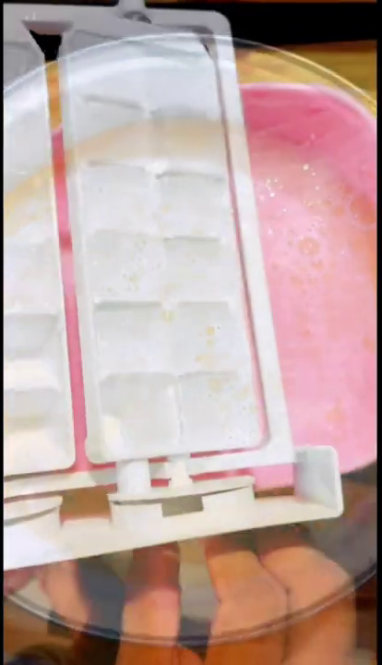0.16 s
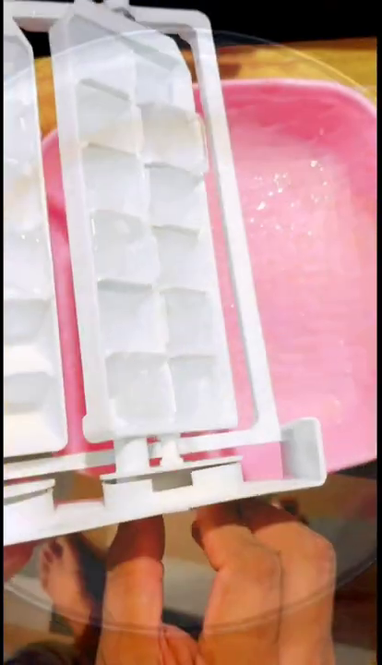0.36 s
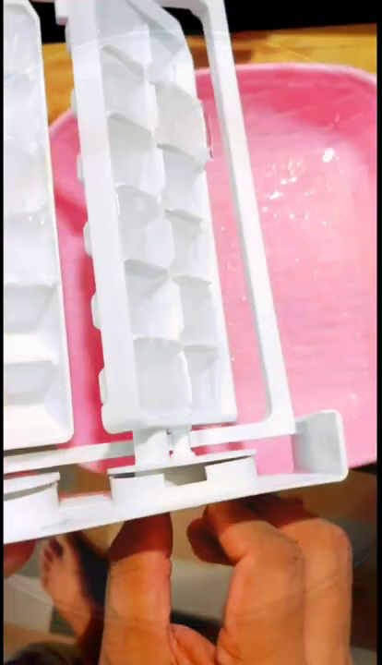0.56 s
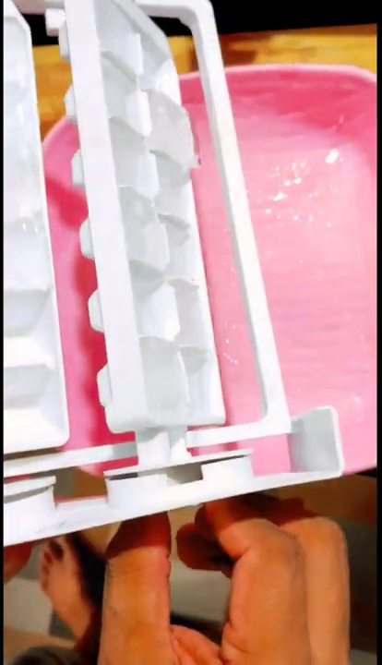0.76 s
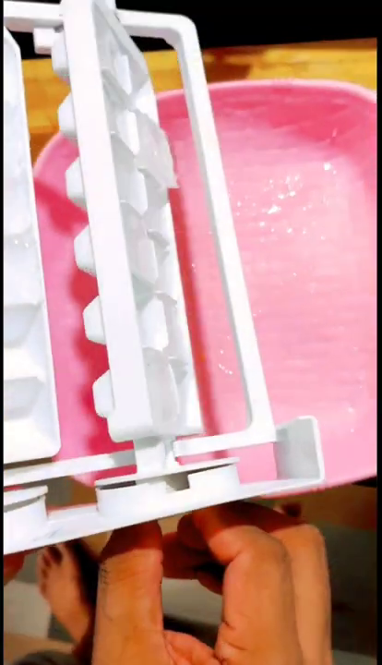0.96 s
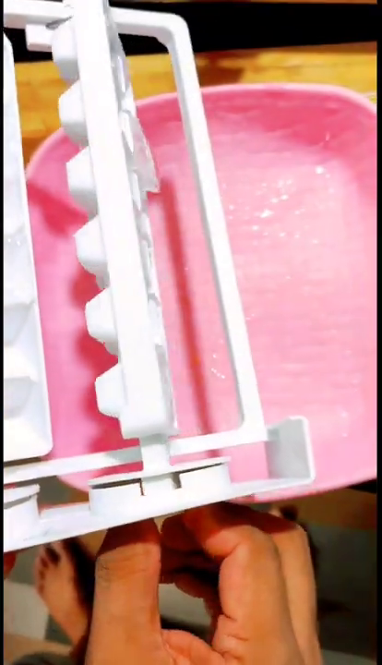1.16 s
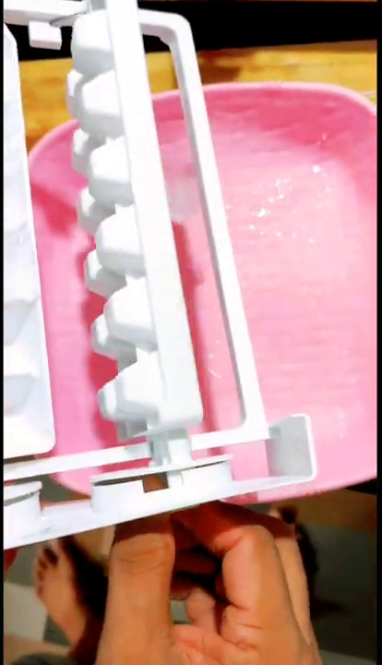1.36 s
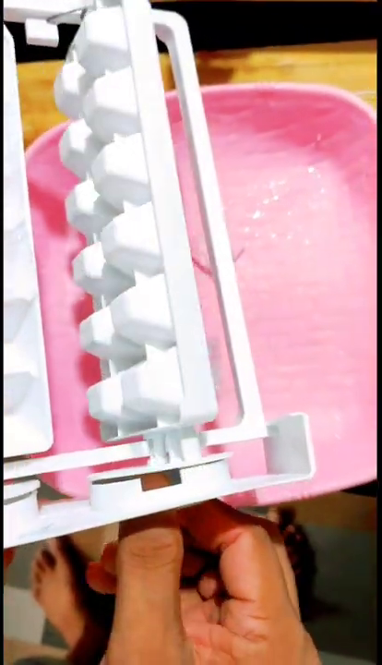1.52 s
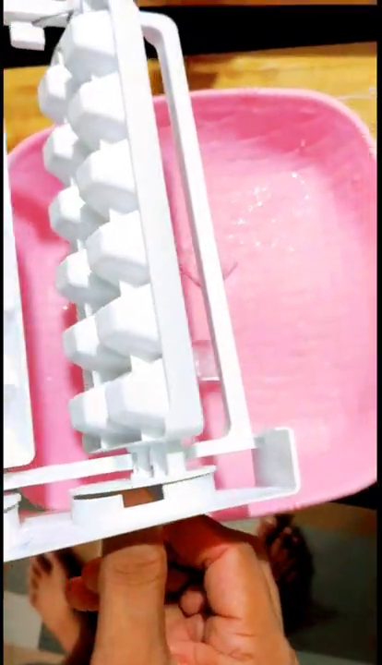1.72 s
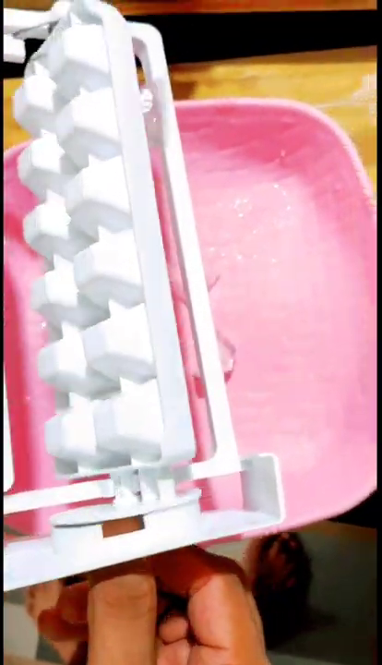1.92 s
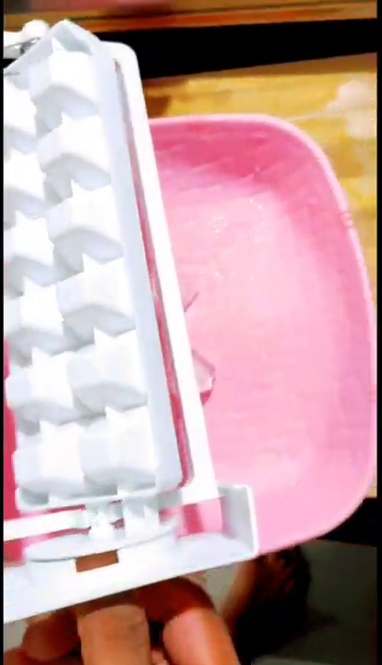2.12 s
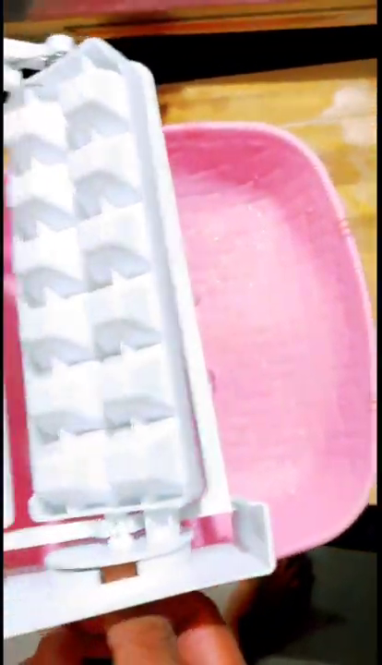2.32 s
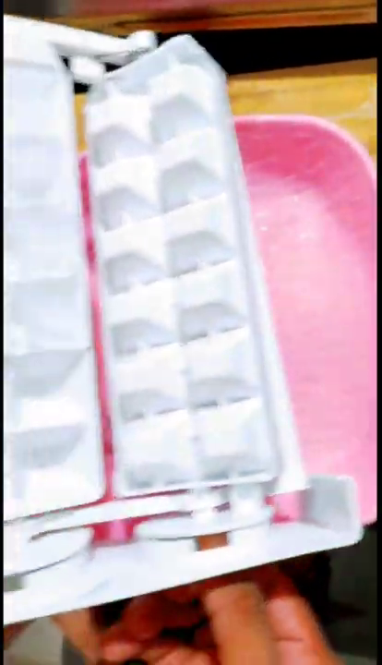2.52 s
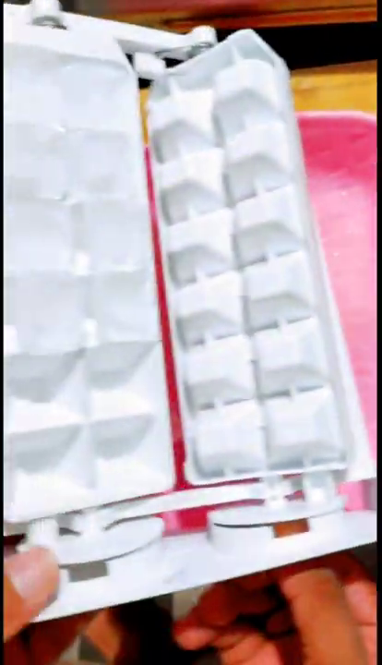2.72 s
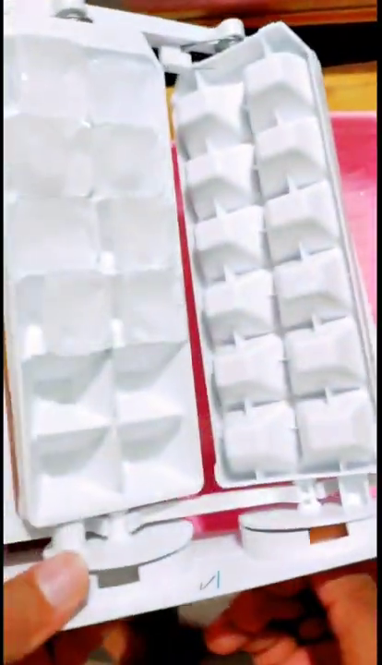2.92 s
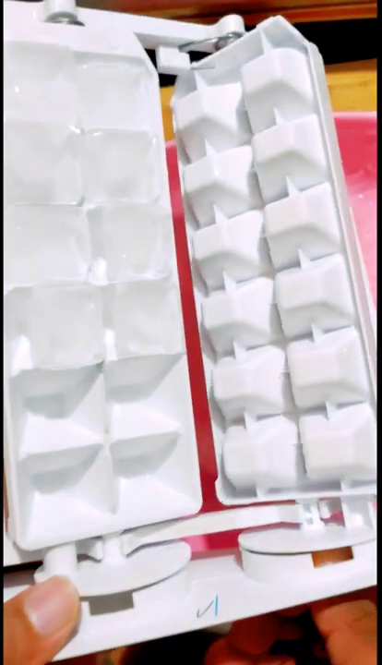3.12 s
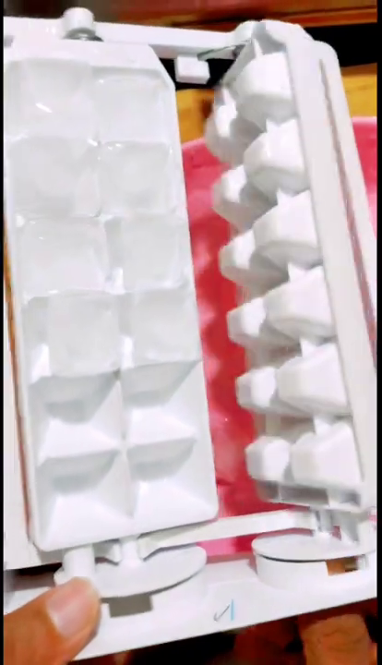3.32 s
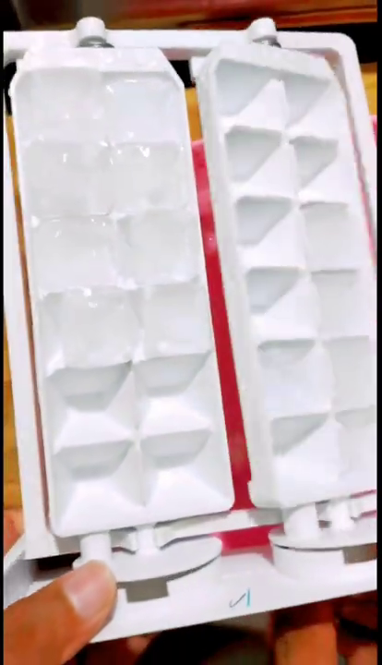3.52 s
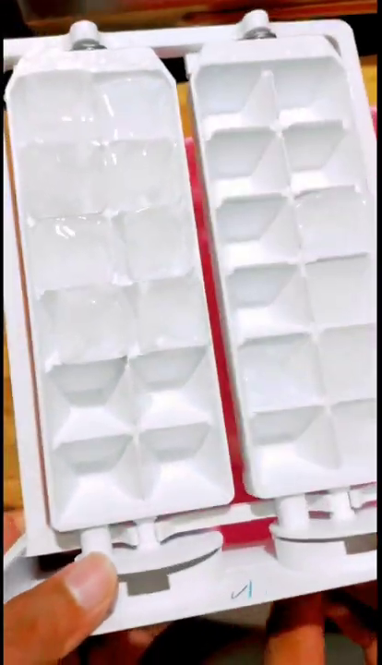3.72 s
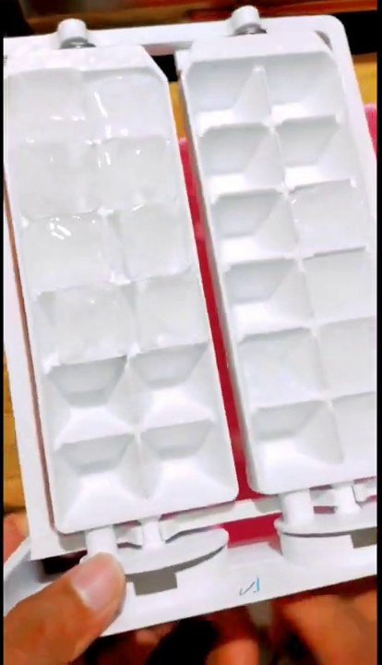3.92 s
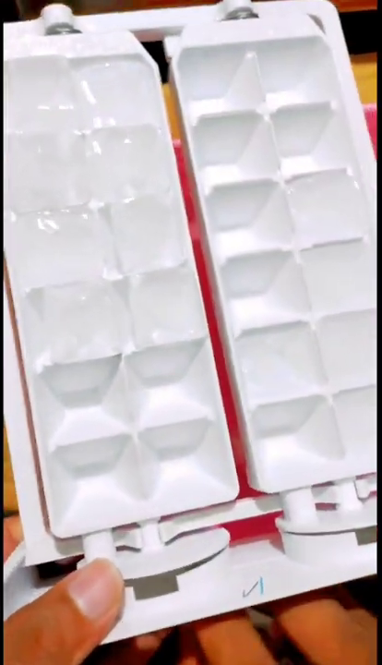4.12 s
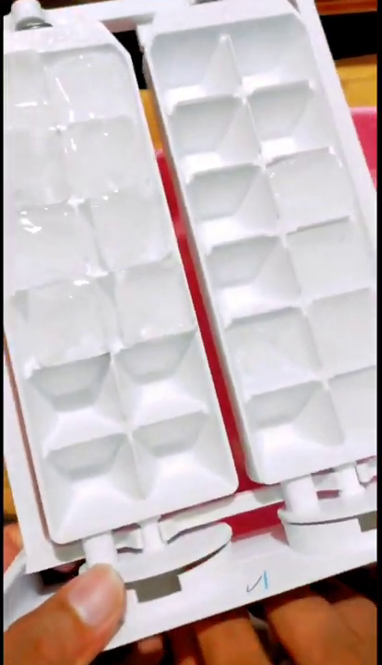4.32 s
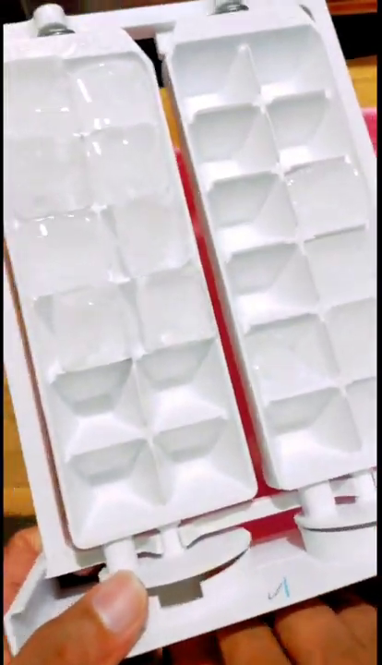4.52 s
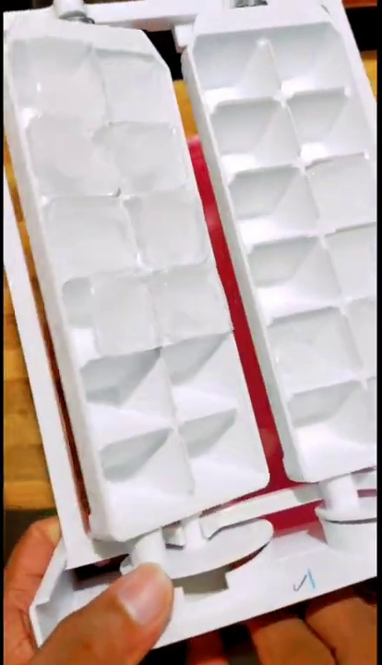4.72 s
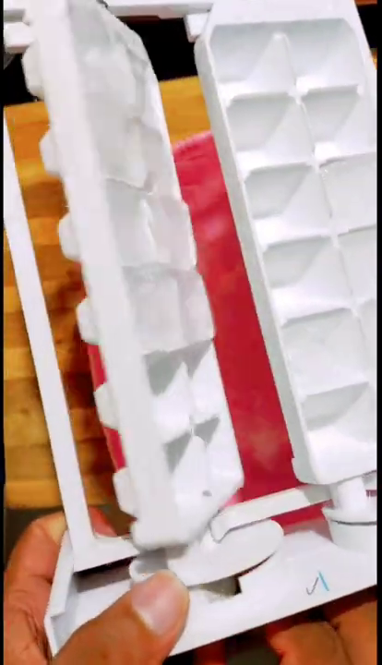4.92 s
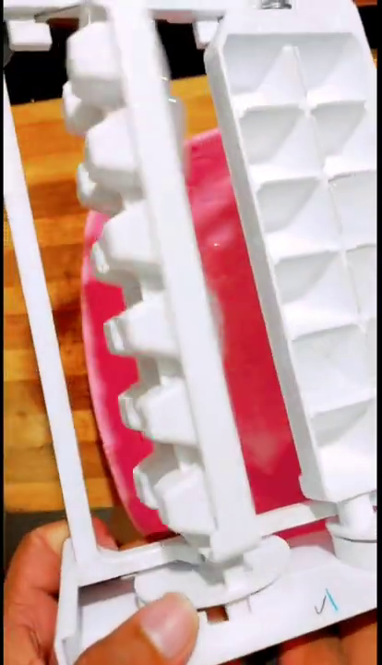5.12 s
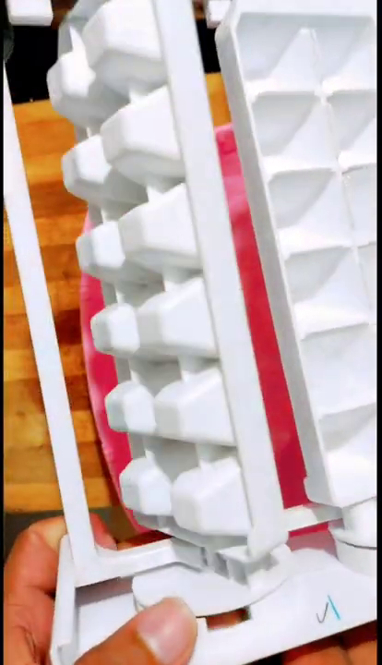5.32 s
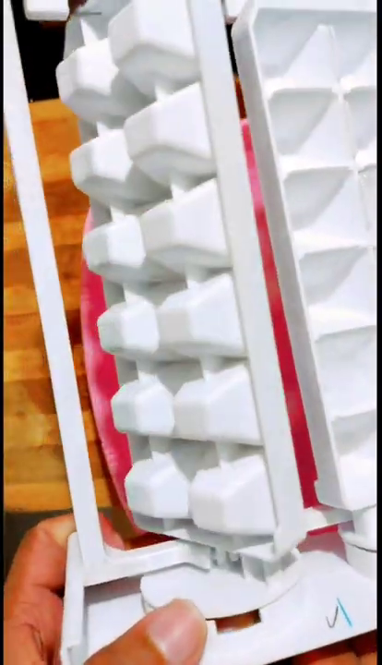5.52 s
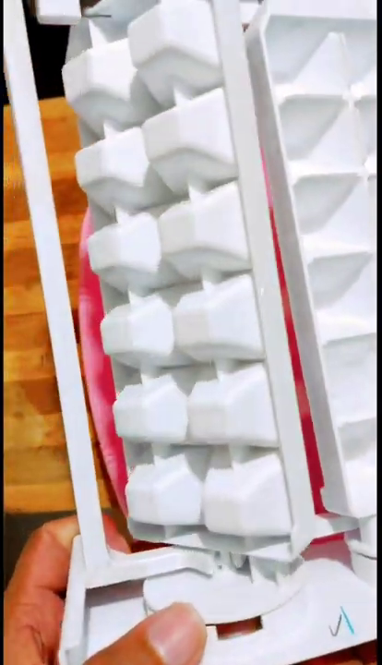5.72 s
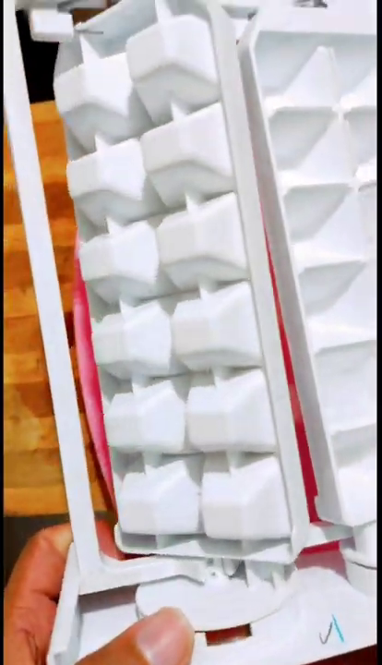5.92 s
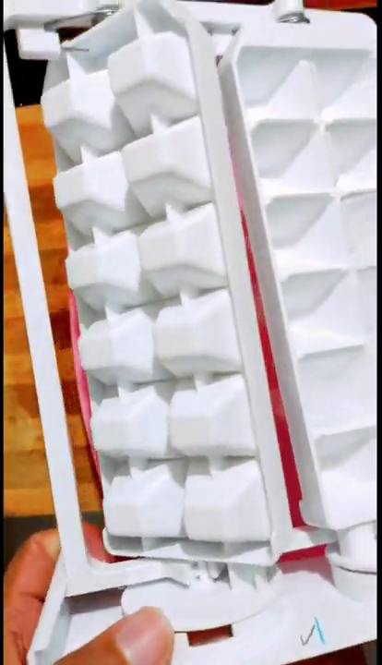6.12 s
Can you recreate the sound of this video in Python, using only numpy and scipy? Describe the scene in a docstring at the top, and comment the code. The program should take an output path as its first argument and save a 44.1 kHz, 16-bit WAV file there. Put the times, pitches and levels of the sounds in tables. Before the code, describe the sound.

In a small hard-walled kitchen, close up, a faint gurgle of liquid fades over soft room tone and low fridge hum. A plastic tray pivot squeaks lightly, then ice cubes knock sharply into a plastic basin and tumble for about a second and a half. Quiet handling follows, then a rougher squeak and a second, denser cascade of ice.

```python
"""Ice cubes crack loose from a turned tray, drop into a plastic basin, knock it and tumble together.
Each contact is a short burst of jolts that rings basin floor, basin wall and ice; the hard walls of the
kitchen answer with decaying noise. The tray's pivots squeak as rough gliding notes and hands rustle on
the frame as noise. Behind them are a humming fridge, a faint whine, room tone and a gurgling glass."""
import sys
import numpy as np
from scipy import signal
from scipy.fft import rfft, irfft, next_fast_len
from scipy.io import wavfile
from scipy.ndimage import uniform_filter1d, map_coordinates

SR = 44100
rng = np.random.default_rng(int(sys.argv[2]) if len(sys.argv) > 2 else 0)


def file_out(sig):
    """Save sig as 16-bit WAV at sys.argv[1]."""
    # one column per channel
    cols = np.atleast_2d(sig).T
    # limit, then scale
    lim = np.clip(cols, -1, 1)
    pcm = np.round(lim * 32767).astype(np.int16)
    wavfile.write(sys.argv[1], SR, pcm)


N = 276066  # length in samples
TIME_S = np.arange(N) / SR


def amp(db):
    """Turn decibels into a plain gain."""
    return 10 ** (np.asarray(db) / 20)


def unit(x):
    """Scale a signal to an rms of 1."""
    return x / np.sqrt(np.mean(x ** 2) + 1e-20)


def along(points, hz):
    """Read a curve of (Hz, value) points between its points, on a log frequency axis."""
    f, v = np.transpose(points)
    return np.interp(np.log(hz + 1), np.log(f + 1), v)


def filtered(x, response):
    """Multiply the spectrum of x by a response, which may be complex."""
    m = next_fast_len(x.shape[-1] + 8192)  # spare room for the ringing
    spectrum = rfft(x, m) * response(np.fft.rfftfreq(m, 1 / SR))
    return irfft(spectrum, m)[..., :x.shape[-1]]


def modes(table):
    """A struck body rings at several resonances; neighbours have opposite signs."""
    def response(f):
        total = 0
        for k, (center, width, db) in enumerate(table):
            resonance = 1j * f * width / (center * center - f * f + 1j * f * width)
            total = total + (-1) ** k * amp(db) * resonance
        return total
    return response


def causal(points):
    """Minimum phase: the given spectrum, with its energy as early as possible."""
    def response(f):
        cepstrum = irfft(np.log(amp(along(points, f)) + 1e-6))
        cepstrum[1:len(cepstrum) // 2] *= 2
        cepstrum[len(cepstrum) // 2 + 1:] = 0
        return np.exp(rfft(cepstrum))
    return response


# Left-right likeness of sound from all around: (frequency [Hz], likeness [0-1])
LIKENESS = [(60, .85), (150, .92), (350, 0.94), (700, 0.8), (1400, 0), (5000, 0.03)]


def diffuse(pair):
    """Mix two unrelated signals so that long waves are alike in both ears."""
    def mix(hz):
        angle = np.arccos(np.clip(along(LIKENESS, hz), -1, 1)) / 2
        return np.array([np.cos(angle), np.sin(angle)])
    mid, side = filtered(pair, mix)
    return np.array([mid + side, mid - side])


def patchy_noise(spectrum, patchy_db):
    """Stereo noise of rms 1 that flickers in patches of time and pitch."""
    z = signal.stft(rng.standard_normal((2, N)), nperseg=512)[2]
    field = uniform_filter1d(rng.standard_normal(z.shape[1:]), size=6, axis=0)
    field = uniform_filter1d(field, size=10, axis=1)
    pair = signal.istft(z * amp(patchy_db * unit(field)), nperseg=512)[1][:, :N]
    return unit(filtered(diffuse(pair), lambda hz: amp(along(spectrum, hz))))


def wavering_note(hz, db, width_hz, steady):
    """A note whose size and phase wander, as noise in a narrow band does."""
    knots = rng.standard_normal((2, int(N * width_hz / SR) + 4))
    a, b = (map_coordinates(k, [np.arange(N) * width_hz / SR]) for k in knots)
    phase = 2 * np.pi * np.cumsum(hz + np.zeros(N)) / SR
    return amp(db) * ((a + steady) * np.cos(phase) + b * np.sin(phase))


def swells(start_s, held_s, db, rise, fall):
    """Each event rises, holds and falls evenly in dB; returns the top level and which event has it."""
    since = TIME_S - start_s[:, None]
    attack = rise * np.minimum(since, 0)
    release = fall * np.maximum(since - held_s[:, None], 0)
    each = db[:, None] + attack - release
    return each.max(axis=0), each.argmax(axis=0)


# Loudness of the room's air over time: (time [s], level [dB])
AIR_LEVEL = [(0, -57), (.08, -50), (.3, -61), (1.552, -54), (3.35, -59.5), (4.2, -58.5), (5.3, -57)]
# Colour of the room's air: (frequency [Hz], density [dB per Hz, relative])
AIR_SPECTRUM = [(24, -31.5), (40, 8.5), (132, -5.5), (192, -3), (377, -3), (438, -9.5), (1450, -24),
                (4030, -34.5), (7340, -39), (12100, -34), (14400, -45), (15500, -57.5)]


def room_tone():
    """The air of the room is a soft noise of slowly changing level."""
    level_db = np.interp(TIME_S, *np.transpose(AIR_LEVEL))
    return amp(level_db) * patchy_noise(AIR_SPECTRUM, patchy_db=3)


# Notes of the fridge: (frequency [Hz], level [dB], width [Hz], steady part [ratio])
FRIDGE_NOTES = [(50.2, -69.5, 2.7, 0.24), (186, -73.5, 5.2, 3.9)]


def fridge():
    """A fridge hums on low notes that waver a little."""
    return sum(wavering_note(*note) for note in FRIDGE_NOTES)


# Gulps of liquid settling in a glass: (loudest from [s], held [s], level [dB], note [Hz], glide [Hz per s])
GULPS = [(0.041, 0.016, -58.5, 1295, -300), (0.159, 0.047, -63, 1073, -500), (.5, 0.26, -70, 693, 257)]


def gurgle():
    """Each gulp of liquid is a rough note that glides."""
    start_s, held_s, db, hz, glide = np.transpose(GULPS)
    level_db, gulp = swells(start_s, held_s, db, rise=500, fall=300)  # dB per s
    note_hz = hz[gulp] + glide[gulp] * (TIME_S - start_s[gulp])
    return wavering_note(note_hz, level_db, width_hz=280, steady=0.1)


# Hands shift on the frame: (loudest from [s], held [s], level [dB])
HAND_SHIFTS = [(.09, 0.076, -68), (.81, 0.046, -77.5), (1.17, 0.091, -86), (1.45, 0.078, -73),
               (3.41, .02, -68.5), (3.56, 0.024, -67.5), (3.73, .02, -70), (4.08, 0.027, -76.5),
               (4.21, 0.0086, -73.5), (4.85, .3, -67.5), (5.34, 0.036, -53.5)]


def grip_level():
    """Each shift of the hands swells quickly and dies more slowly; in dB."""
    return swells(*np.transpose(HAND_SHIFTS), rise=160, fall=72)[0]  # dB per s


def whine(grip_db):
    """A faint high whine grows while hands load the frame."""
    rest_db, under_grip_db = -92.5, 11
    level_db = np.maximum(rest_db, grip_db - under_grip_db)
    return wavering_note(4010, level_db, width_hz=380, steady=.1)


# Colour of skin on the frame: (frequency [Hz], density [dB per Hz, relative])
SKIN_SPECTRUM = [(530, -52), (900, -17.5), (2000, -20), (2890, -9.5), (3180, -22.5), (3300, -14.5),
                 (13000, -17), (14600, -22.5), (15500, -52.5)]


def hands(grip_db):
    """Skin rubbing on the frame makes a patchy rustle."""
    return amp(grip_db) * patchy_noise(SKIN_SPECTRUM, patchy_db=2.5)


def background():
    """Room tone, fridge, glass and hands, added together."""
    grip_db = grip_level()
    return fridge() + whine(grip_db) + gurgle() + room_tone() + hands(grip_db)


# The tray turns on its pivots:
# (loudest from [s], held [s], low pivot level [dB], high pivot level [dB], low pivot note [Hz])
TRAY_TURNS = [(1.33, .1, -72.5, -99, 2651), (1.47, 0.11, -64.5, -87, 2720), (4.46, 0.048, -70, -78.5, 2630),
              (5.02, 0.047, -71.5, -71.5, 2585), (5.35, .02, -57, -79, 2640)]


def squeaks():
    """Plastic pivots rub and sing roughly; each note sinks as the turn slows."""
    rise, fall, sag_hz_per_s = 150, 61, 200  # rise and fall in dB per s
    high_hz, high_leads_s = 3117, .05  # the high pivot has a head start
    start_s, held_s, low_db, high_db, low_hz = np.transpose(TRAY_TURNS)
    low_level, low_turn = swells(start_s, held_s, low_db, rise, fall)
    high_level, high_turn = swells(start_s - high_leads_s, held_s, high_db, rise, fall)

    def sag(turn):
        return sag_hz_per_s * np.clip(TIME_S - start_s[turn], -.2, .4)

    def one_ear():
        low = wavering_note(low_hz[low_turn] - sag(low_turn), low_level, width_hz=190, steady=0.71)
        high = wavering_note(high_hz - sag(high_turn), high_level, width_hz=120, steady=2.1)
        return low + high
    return np.array([one_ear(), one_ear()])


# Reverberation of the kitchen: (frequency [Hz], time to fall by 60 dB [s])
KITCHEN_T60 = [(150, 0.4), (500, 0.39), (2500, 0.27), (8000, 0.27), (15000, 0.21)]


def kitchen(dry, size=4096):
    """Hard walls answer with fading noise; the cubes move, so each moment gets its own tail."""
    wet = np.zeros((2, N + SR))
    for at in range(0, N, size):
        part = dry[at:at + size]
        if np.abs(part).max() > 1e-4:  # skip near silence
            hz, t, z = signal.stft(rng.standard_normal((2, SR // 2)), SR, nperseg=256)
            decay = amp(-60 * t / along(KITCHEN_T60, hz)[:, None])
            tail = signal.istft(z * decay, SR, nperseg=256)[1]
            tail *= 1 - np.exp(-np.arange(tail.shape[1]) / SR / 0.00059)  # a soft start
            tail /= np.linalg.norm(tail[0])
            answer = signal.fftconvolve(part[None], tail, axes=1)
            wet[:, at:at + answer.shape[1]] += answer
    return diffuse(wet[:, :N])


# Cubes slide and rattle after a spill: (loudest from [s], held [s], level of the softest contacts [dB])
SLIDES = [(1.76, 0.24, -44), (2.35, 0.11, -30), (2.55, 0.58, -38), (5.53, .24, -27), (5.85, 0.26, -41)]


def tumble(count=300):
    """Sliding cubes make many small contacts of random size; columns as in CONTACTS."""
    level_db = swells(*np.transpose(SLIDES), rise=200, fall=130)[0]  # dB per s
    draw = rng.random((count, 5))
    moving = np.flatnonzero(level_db > -62)
    at = moving[(draw[:, 0] * len(moving)).astype(int)]
    db = level_db[at] + 12 * draw[:, 1]
    thud_db = -14 + 9 * draw[:, 2]
    click_db = -26 + 9 * draw[:, 3]
    spot_hz = 500 * 5 ** draw[:, 4]
    return np.column_stack([at / SR, db, thud_db, click_db, spot_hz])


# Resonances of the basin floor: (frequency [Hz], width [Hz], relative level [dB])
FLOOR_MODES = [(204, 51, -10), (321, 44, 1), (378.4, 6, 1.5), (490, 23, 3.5), (520.2, 9.9, -8.5)]
# Resonances of basin wall and tray cells: (frequency [Hz], width [Hz], relative level [dB])
WALL_MODES = [(720, 6.4, -11.5), (875, 13, 6.5), (958, 37, -3), (1284, 27, -9.5), (1560, 40, -2.5),
              (1947, 7.7, 4.5), (1964, 110, -3), (2040, 33, -7)]
# Click of ice: (frequency [Hz], density [dB per Hz, relative])
ICE_SPECTRUM = [(1180, -38), (2000, -21), (2560, -10), (3070, -5), (7050, -8.5), (7610, -9.5), (11100, -7),
                (14700, -16), (15500, -25)]
# The part of a knock that does not ring: (frequency [Hz], relative level [dB])
BLOW_SPECTRUM = [(60, -14.5), (160, -9), (400, -3), (1000, -1.5), (2200, 0.5), (3000, -5.5), (4500, -11),
                 (9000, -23)]


def strike(contacts, size=1024):
    """A few ms of jolts ring basin floor, basin wall and ice; rows: left, right, all around."""
    floor_db, wall_db, click_gain_db = 32.5, 16, 27  # how readily each body answers a blow
    spot_t60_s = 0.02
    # force is (floor, wall, ice) by (left, right, all around)
    force, spot = np.zeros((3, 3, N + size)), np.zeros((3, N + size))
    t = np.arange(size) / SR
    t60_s = np.array([[[.018]], [[.009]], [[.011]]])
    fade = amp(-60 * t / t60_s) * (1 - np.exp(-t / 0.00045))
    for s, db, thud_db, click_db, spot_hz in contacts:
        # short waves differ more between the ears
        both, own = rng.standard_normal((3, 1, size)), rng.standard_normal((3, 2, size))
        jolts = fade * ([[[1]], [[.6]], [[.2]]] * both + [[[.15]], [[.9]], [[1]]] * own)
        jolts[..., :6] += [[[.3]], [[.8]], [[.8]]]  # a push at first touch
        jolts /= np.linalg.norm(jolts, axis=2, keepdims=True)
        blow = amp(db + np.array([thud_db + floor_db, wall_db, click_db + click_gain_db]))
        at = round(s * SR)
        aim = amp(rng.normal(1, 1, (2, 1)))  # each blow favours one ear a little
        force[:, :2, at:at + size] += blow[:, None, None] * aim * jolts
        force[2, 2, at:at + size] += blow[2] * jolts[2, 0]
        # summed over all directions the blow has an even spectrum
        force[:2, 2, at] += rng.choice([-1, 1], size=2) * blow[:2]
        # the struck spot has a note of its own that dies at once
        phase = 2 * np.pi * (spot_hz * t + rng.random((3, 1)))
        spot_level = amp(db - 6 - 60 * t / spot_t60_s + [[0], [0], [-9]])
        spot[:, at:at + size] += spot_level * (1 - np.exp(-t / 0.00028)) * np.sin(phase)

    def floor(f):
        return modes(FLOOR_MODES)(f) + amp(-10.0) * causal(BLOW_SPECTRUM)(f) / (1 + 1j * f / 700)

    def wall(f):
        return modes(WALL_MODES)(f) + causal(BLOW_SPECTRUM)(f)

    thuds, knocks = filtered(force[0], floor), filtered(force[1], wall)
    clicks = filtered(force[2], causal(ICE_SPECTRUM))
    return spot + thuds + knocks + clicks


# Knocks and cracks, levels before each body's own gain: (time [s], wall level [dB],
# basin thud over wall [dB], ice click over wall [dB], note of the struck spot [Hz])
CONTACTS = [(0.48, -49, -6, 3, 3750), (0.949, -63.5, 13, -15, 538), (0.998, -54, 3, -34, 517),
            (1.483, -50.5, -16, -25, 2480), (1.589, 1, -13, -16, 2025), (1.597, -1.5, -10, -16.5, 1725),
            (1.706, -4, -14.5, -17, 1810), (1.737, -17, -29, 1, 3990), (1.836, 0, -8.5, -15.5, 1988),
            (1.919, -9, -13.5, -13.5, 954), (1.951, -11.5, -11, -17, 1764), (2.1, -22, -36, 2.5, 3900),
            (2.109, -16, -41, -12.5, 1790), (2.214, 0.5, -8.5, -19.5, 1500), (2.324, 0, -8.5, -18, 1325),
            (2.33, -5.5, -9, -24.5, 1817), (2.342, -1, -33, -15.5, 1807), (2.498, -16, -10.5, -20.5, 1866),
            (2.559, -14, -20, -14.5, 1980), (2.566, -13.5, -35, 0, 3300), (2.574, -20, -5, -10.5, 2818),
            (2.632, -20, -7, -27, 992), (2.673, -1.5, -9.5, -18.5, 1941),
            (2.703, -10.5, -1.5, -14.5, 453.5), (2.757, -3.5, -28, -16, 1930),
            (2.842, -13.5, -37, -7, 3894), (2.886, -21.5, -33, -7, 3960), (2.891, -16.5, -32, -7, 3860),
            (2.91, -3, -19, -22.5, 1855), (2.937, -0.5, -37, -25.5, 2249), (2.954, -3.5, -30, -11, 1987),
            (2.961, -9, -0.5, -39.5, 2009), (2.984, -4.5, -38, -14, 1800), (2.996, -1.5, -33, -15.5, 1860),
            (3.01, -14.5, -9, -14.5, 1004), (3.088, -12, -7.5, -43, 1793), (3.178, -21.5, -6, -37.5, 532),
            (3.563, -45, -9, -15, 590), (3.725, -52, -14, -15, 1800), (3.762, -35.5, -34, 2, 4430),
            (4.062, -69, -18, 6, 1900), (4.098, -69.5, -19, 7.5, 3000), (4.21, -69.5, -19.5, 8.5, 7000),
            (5.288, -69, -20, 5.5, 5200), (5.319, -42, -0.5, -19, 2660), (5.376, -26.5, -15.5, 9.5, 4200),
            (5.38, -8.5, -27, -3.5, 3028), (5.423, -16.5, -8.5, 0.5, 4200), (5.441, -22, -31, -6, 2260),
            (5.502, 2, -15, -25, 2290), (5.51, -0.5, -33, -15, 1580), (5.518, -3, -3.5, -10, 2260),
            (5.531, -5.5, -9, -16.5, 1530), (5.557, -1.5, -8, -18, 970), (5.569, 1, -25, -22, 1410),
            (5.59, -5, -14, -32, 1560), (5.626, -0.5, -20, -20, 2330), (5.639, -13, -14, -9.5, 513),
            (5.684, -8.5, -15, -9.5, 550), (5.702, -7, -40, -18, 1470), (5.74, -7, -34, -33, 2460),
            (5.759, -8, -36, -20.5, 1700), (5.823, -15, -20, -22, 1020), (5.836, -6, -29, -8.5, 1560),
            (5.857, -16, -19, -19.5, 996), (5.935, -22, -1.5, -22, 1310), (5.973, 0.5, -11.5, -18, 980),
            (6.002, -39, -16, -18, 471.4), (6.064, -7.5, -33, -11, 1578), (6.071, -22.5, -11, -36, 991),
            (6.11, -22.5, -31, -9, 1560), (6.148, -14.5, -41, -13.5, 1410)]


def ice_in_basin():
    """Single knocks and tumbling cubes, heard directly and through the kitchen's answer."""
    ice = strike(np.vstack([CONTACTS, tumble()]))[:, :N]
    balance = amp([[.7], [-.7]])  # a little louder on the left
    return balance * (ice[:2] + amp(3.0) * kitchen(ice[2]))


def scene():
    """All sources in stereo; the right ear is a little further away."""
    left, right = ice_in_basin() + squeaks() + background()
    right_lag = 10  # samples
    return np.array([left, np.pad(right, (right_lag, 0))[:N]])


def record(dry):
    """Round off the highest peaks, thin the deepest bass, fade above 13.5 kHz and stop at the band limit."""
    top_hz = 15950
    rounded = dry / (1 + np.abs(dry / .88) ** 5) ** (1 / 5)
    # (frequency [Hz], gain [dB])
    curve = [(20, -32), (45, -5.5), (13500, 1.5), (14500, -2.5), (15000, -22.0), (16000, -28.5)]
    return filtered(rounded, lambda hz: (hz < top_hz) * amp(along(curve, hz)))


dry = scene()
out = record(dry)
file_out(out)
```